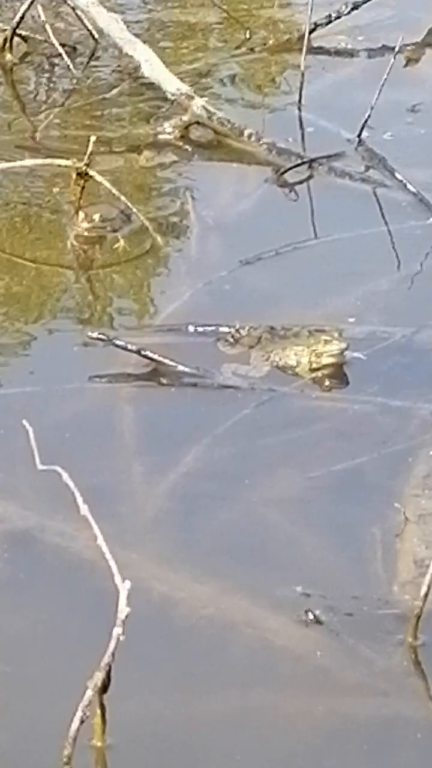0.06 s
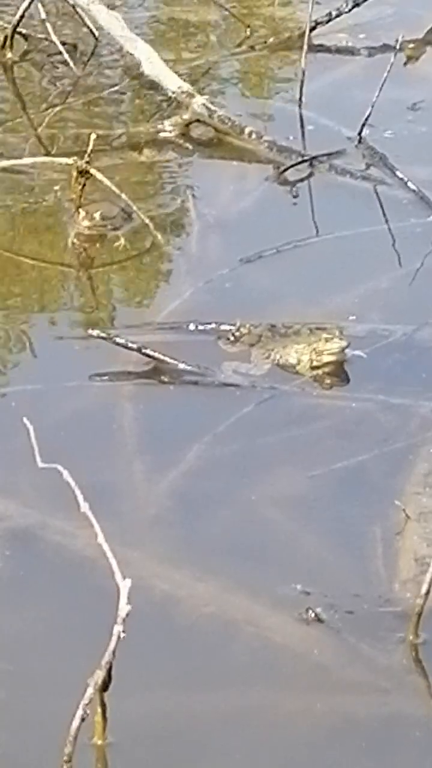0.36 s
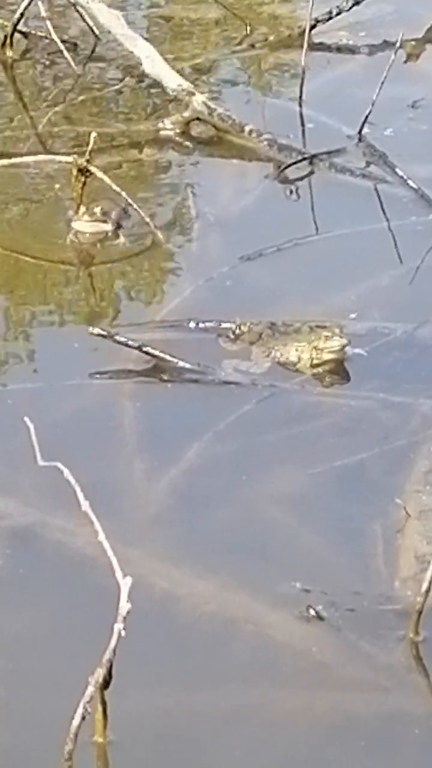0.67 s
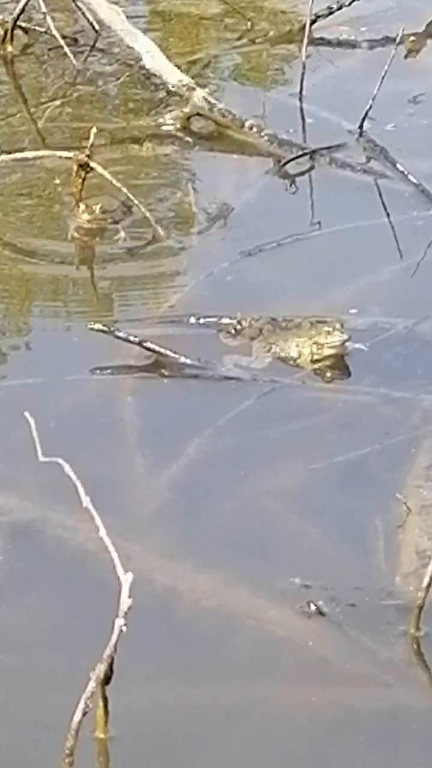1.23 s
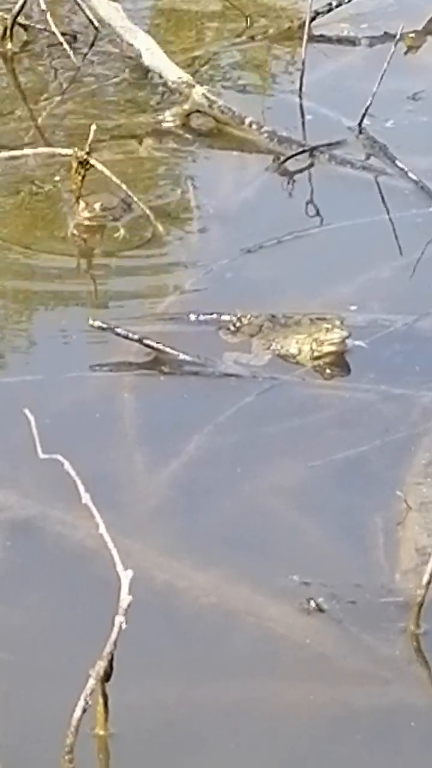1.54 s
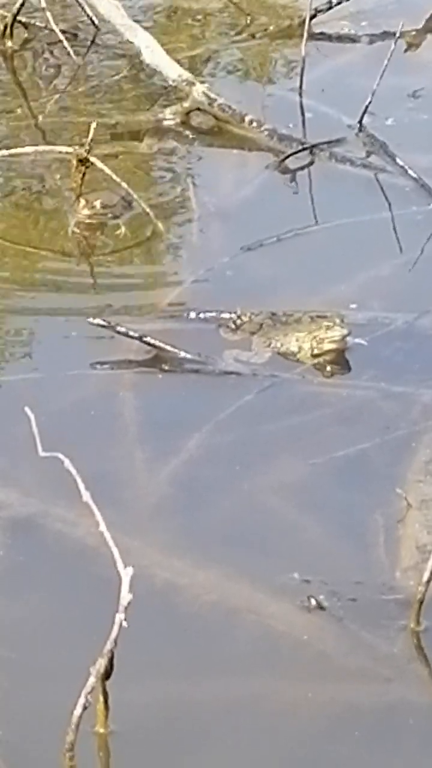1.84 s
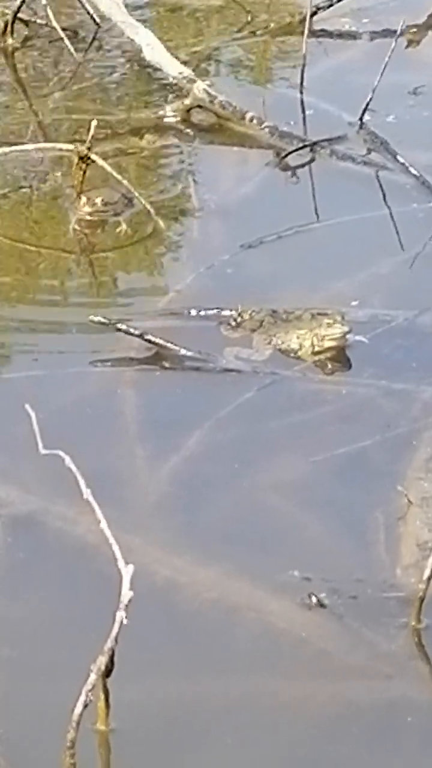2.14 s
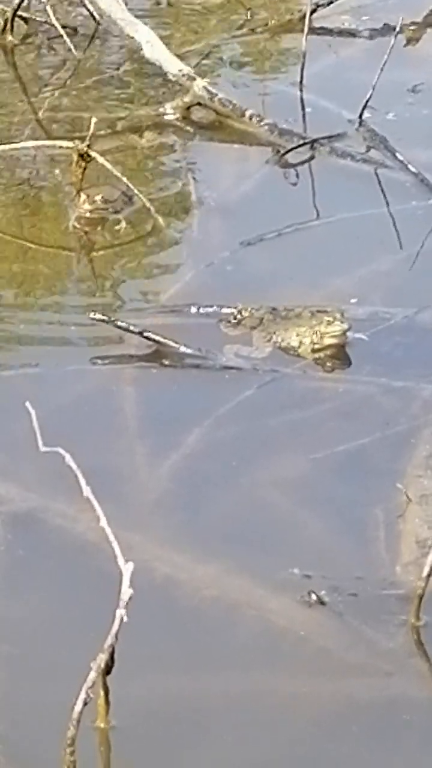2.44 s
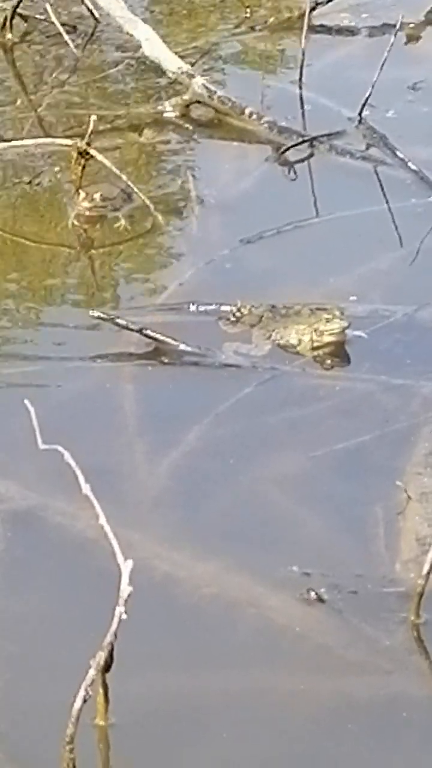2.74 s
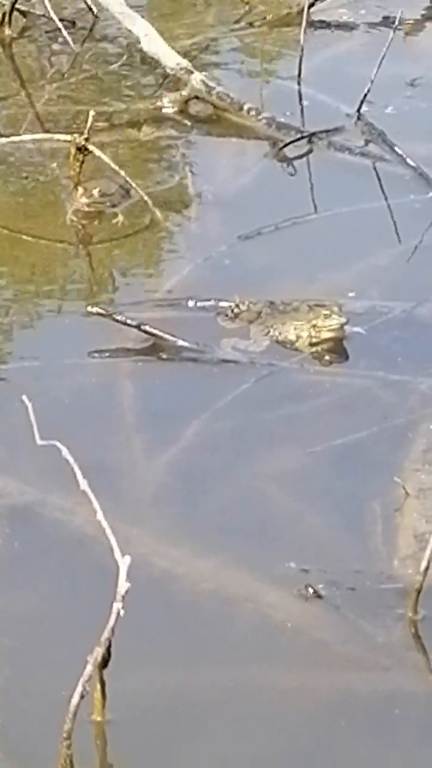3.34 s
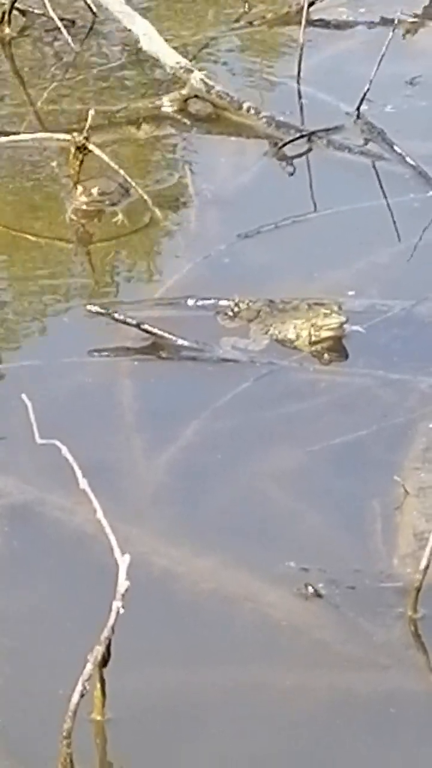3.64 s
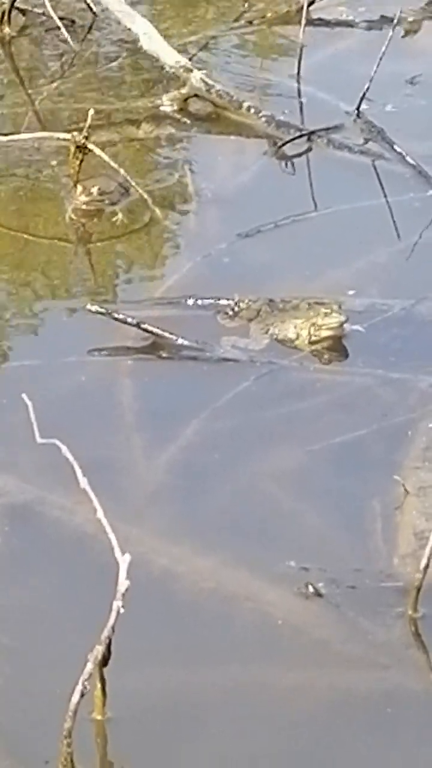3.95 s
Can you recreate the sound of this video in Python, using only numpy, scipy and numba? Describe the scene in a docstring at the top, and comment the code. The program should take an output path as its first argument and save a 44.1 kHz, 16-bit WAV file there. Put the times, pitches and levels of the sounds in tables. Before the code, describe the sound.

Frogs croak at a pond. A bright one close to the microphone trills in three quick runs while deep, nasal and whining ones cut in and others call further off, over a faint breeze rumble and soft hiss.

```python
"""At a pond, water frogs call to each other. Each note is a train of throat pulses that slows and
turns ragged as the breath runs out, ringing in the vocal sacs (the frog's balloon-like cheeks).
A bright frog trills close by, a nasal, a deep and a whining one cut in, and others call further off.
The banks echo a little, a bird chirps twice, and a breeze rumbles on the microphone over a soft hiss."""
import sys
import numpy as np
from scipy import signal
from scipy.fft import rfft, irfft, next_fast_len
from scipy.io import wavfile
from scipy.ndimage import uniform_filter1d
from numba import njit

SR = 44100
rng = np.random.default_rng(int(sys.argv[2]) if len(sys.argv) > 2 else 0)


def transcribe(u):
    """Save the signal u as a 16-bit wav file named by the first command-line argument.

    u: samples, shape (n,) or (channels, n), limited to [-1, 1]; the rate is SR.
    q: integer samples, one column per channel.
    """
    v = np.clip(np.atleast_2d(u).T, -1, 1)
    q = np.round(v * 32767).astype(np.int16)
    wavfile.write(sys.argv[1], SR, q)


N = 176400
TIME_S = np.arange(N) / SR
PADDED = next_fast_len(N + SR)  # spare room for echoes to die away


def from_db(db):
    """Turn decibels into a number to multiply by."""
    return 10 ** (np.asarray(db) / 20)


def rms_one(x):
    """Scale a sound so that its average power is 1."""
    return x / np.sqrt(np.mean(x ** 2) + 1e-20)


def at_hz(points, hz):
    """Read between rows of (frequency, value), giving each octave equal room."""
    row_hz, value = np.transpose(points)
    return np.interp(np.log(np.maximum(hz, 1)), np.log(row_hz), value)


def coloured(x, colour, size):
    """Turn each frequency up or down as a colour table says."""
    gain = from_db(at_hz(colour, np.arange(size // 2 + 1) * SR / size))
    cepstrum = irfft(np.log(gain), size)
    # folding this in half makes the filter ring after a pulse, never before it
    cepstrum[1:size // 2] *= 2
    cepstrum[size // 2 + 1:] = 0
    return irfft(rfft(x, size) * np.exp(rfft(cepstrum)), size)


@njit
def ringing(x, hz, width_hz):
    """Make a sound ring at a moving pitch; a narrower width rings longer."""
    angle = 2 * np.pi * hz / SR
    r = np.exp(-np.pi * width_hz / SR)
    y = np.zeros(len(x))
    for i in range(2, len(x)):
        push = (1 - r * r) / 2 * (x[i] - x[i - 2])
        y[i] = push + 2 * r * np.cos(angle[i]) * y[i - 1] - r * r * y[i - 2]
    return y


def throat(rate_hz, ragged, jitter, count=96, waver=.009, uneven_db=3.75, breath=.07):
    """Sharp pulses, each with a puff of hiss. Where ragged, their timing and strength are uneven."""
    size = len(rate_hz)
    cycles = np.cumsum(rate_hz) / SR
    slip, force, wander = rng.standard_normal((3, count))
    ragged = np.interp(np.arange(count), cycles, ragged)
    due = np.arange(count) + .5 + waver * np.cumsum(wander) + jitter * ragged * slip
    strengths = from_db(uneven_db * ragged * np.minimum(force, 1))
    pulses = np.zeros(size)
    for cycle, strength in zip(due, strengths):
        if cycle < cycles[-1]:
            at = np.interp(cycle, cycles, np.arange(size))
            near = np.arange(max(int(at) - 10, 0), min(int(at) + 10, size))
            pulses[near] += strength * np.sinc(near - at)  # a click that can fall between samples
    puffs = rng.standard_normal(size) * np.exp(-2 * (cycles % 1))
    return pulses + breath * puffs * 2 * np.sqrt(rate_hz / SR)


def vocal_sac(pulses, sac_hz, voice):
    """The tight sac rings on between pulses; 'even' (0 to 1) steadies how loudly it rings."""
    ring = ringing(pulses, sac_hz, voice['width_hz'])
    loudness = uniform_filter1d(np.abs(signal.hilbert(ring)), size=16)
    steadied = ring / (loudness / loudness.mean() + .1) ** voice['even']
    return pulses + from_db(voice['sac_db']) * steadied


# Short detours the sound takes off twigs and water: delay_s
DETOURS_S = [0.00065, 0.00079, .00137]
def scattered(x, smear):
    """Very quick repeats off twigs and water blur each pulse (all-pass filters)."""
    for delay_s in DETOURS_S:
        gap = np.zeros(int(delay_s * SR))
        x = signal.lfilter(np.r_[-smear, gap, 1], np.r_[1, gap, -smear], x)
    return x


def croak(length_s, rate_hz, sac_hz, glide_hz, voice, colour, ring, size=8192):
    """One note: the pulses speed up to a crest, then slow and turn ragged. It swells and stops short."""
    t = np.arange(int((length_s + voice['release_s']) * SR)) / SR
    along = np.minimum(t / length_s, 1)  # 0 to 1; 'crest' and 'full_at' are points on this scale
    sag_chance, ring_chance = rng.uniform(-.987, 1, 2)
    before = np.maximum(1 - along / voice['crest'], 0)
    after = np.maximum(along - voice['crest'], 0) / (1 - voice['crest'])
    sag = voice['sag'] * (1 + .119 * sag_chance)  # share of the pulse rate lost by the end
    speed = 1 - voice['lift'] * before ** 2 - sag * after ** voice['sag_curve']
    pulses = throat(rate_hz * speed, after ** 2, voice['jitter'])
    sound = vocal_sac(pulses, sac_hz + glide_hz * along, voice)
    if ring:
        bend = ring['spread'] * ring_chance - ring['bow'] * (2 * along - 1) ** 2 / 2
        sound += from_db(ring['db']) * ringing(pulses, ring['hz'] * (1 + bend), ring['width_hz'])
    growth = np.minimum(along / voice['full_at'], 1) ** voice['swell_curve']
    swell = voice['start_gain'] + (1 - voice['start_gain']) * growth
    stop = np.clip(1 - (t - length_s) / voice['release_s'], 0, 1)
    sound = scattered(coloured(sound * swell * stop, colour, size), voice['smear'])
    return rms_one(sound) * np.sqrt(length_s * SR / size)


# Echoes off the banks: left_delay_s, right_delay_s, level_db (added to each caller's echo_db)
BANK_ECHOES = [(.0085, 0.0069, 2), (0.0204, 0.03, -3.5)]
def pond_echoes(fade_s=.35, tail_db=-1.5):
    """The pond's answer to a click, as a spectrum: bank echoes and a thin tail from the bushes."""
    t = np.arange(SR) / SR
    tail = rng.standard_normal((2, SR)) * from_db(-60 * t / fade_s) * (t > .006)
    response = from_db(tail_db) * rms_one(tail) / np.sqrt(SR)
    for left_s, right_s, db in BANK_ECHOES:
        response[[0, 1], [int(left_s * SR), int(right_s * SR)]] += from_db(db)
    return rfft(response, PADDED)


def placed(dry, place, echo_db, echoes):
    """Give a caller a direction by level and timing between the ears, and add its echoes."""
    hz = np.maximum(np.arange(PADDED // 2 + 1) * SR / PADDED, 1)
    ears, place = np.array([[1], [-1]]), np.array(place)
    gain = from_db(ears * at_hz(place[:, :2], hz) / 2)
    gain /= np.sqrt(np.mean(gain ** 2, axis=0))
    lead_s = at_hz(place[:, ::2], hz) / 1000
    direct = np.exp(1j * np.pi * hz * lead_s * ears)
    return irfft(rfft(dry, PADDED) * gain * (direct + from_db(echo_db) * echoes), PADDED)[:, :N]


def frog(notes, voice, colour, place, echoes, ring=None):
    """Play one frog's croaks from its spot on the pond."""
    dry = np.zeros(PADDED)
    for start_s, length_s, db, rate_hz, sac_hz, glide_hz in notes:
        sound = from_db(db) * croak(length_s, rate_hz, sac_hz, glide_hz, voice, colour, ring)
        first = int((start_s - sum(DETOURS_S)) * SR)  # early, because the detours delay it
        dry[first + np.arange(len(sound))] += sound
    return placed(dry, place, voice['echo_db'], echoes)


# Notes of the trill: start_s, level_db
TRILL_NOTES = [(-.03, -23.5), (.058, -21), (.15, -22.5), (0.234, -30.5), (1.055, -23), (1.143, -22),
               (1.236, -21), (1.325, -20.5), (1.417, -20), (1.509, -21), (1.598, -21.5), (1.687, -21),
               (1.78, -21.5), (2.391, -23.5), (2.469, -22), (2.555, -21.5), (2.643, -21.5), (2.731, -21),
               (2.82, -21.5), (2.91, -21), (3, -21.5), (3.09, -20.5), (3.183, -22.5), (3.272, -24.5),
               (3.363, -32)]
# How the trill moves: time_s, pulse_rate_hz, sac_hz, overtone_hz
TRILL_PITCHES = [(.13, 408.4, 2530, 9500), (.236, 337, 2180, 9740), (1.056, 449.2, 2160, 12500),
                 (1.24, 434.7, 2600, 10770), (1.7, 416.7, 2540, 8950), (2.39, 404.8, 2460, 11240),
                 (3.17, 368.5, 3024, 9150), (3.365, 272.5, 2450, 8270)]
# Its tone colour: frequency_hz, level_db
TRILL_TONE = [(200, -60), (370, 4), (750, 2.5), (1500, -5), (2700, 5), (3130, -6), (3410, 6), (4000, 2.5),
              (4900, -9), (6300, -11), (7250, -3.5), (8100, -11.5), (14500, -23)]
# Its direction: frequency_hz, left_louder_db, left_earlier_ms
TRILL_PLACE = [(1250, -2.5, 0.06), (2484, -9, 0.15), (3150, 5, .12), (6670, -14.5, 0.096), (9100, 3, 0.075)]
def bright_frog(echoes, length_s=.043, glide_hz=-120, overtone_width_hz=770, overtone_db=15):
    """Quick runs of notes close by, with a thin high ring that sinks as the trill tires."""
    voice = dict(start_gain=.21, full_at=.64, swell_curve=1.23, release_s=.003,
                 lift=.1446, crest=.38, sag=.45, sag_curve=2.2, jitter=.032,
                 width_hz=820, sac_db=42.5, even=.35, smear=.56, echo_db=-18.5)
    times, rate_hz, sac_hz, overtone_hz = np.transpose(TRILL_PITCHES)
    notes = [(s, length_s, db, np.interp(s, times, rate_hz), np.interp(s, times, sac_hz), glide_hz)
             for s, db in TRILL_NOTES]
    ears = frog(notes, voice, TRILL_TONE, TRILL_PLACE, echoes)
    hz = np.interp(TIME_S, times, overtone_hz)
    overtone = [ringing(ringing(ear, hz, overtone_width_hz), hz, overtone_width_hz) for ear in ears]
    return ears + from_db(overtone_db) * np.array(overtone)


def noise(colour):
    """Noise with a tone colour, different in each ear."""
    return rms_one(coloured(rng.standard_normal((2, PADDED)), colour, PADDED)[:, :N])


# Tone colour of the hiss: frequency_hz, level_db
AIR_TONE = [(1400, -0.5), (6000, -16.5), (15000, -28.5)]
def still_air(level_db=-61):
    """A soft, steady hiss behind everything."""
    return from_db(level_db) * noise(AIR_TONE)


# Strength of the breeze before gusts are added: time_s, level_db
BREEZE_LEVELS = [(.4, -69), (.58, -52), (.8, -63.5), (1.85, -65.5), (2.05, -47), (2.35, -55.5),
                 (2.85, -48.5), (4, -51)]
# Its tone colour: frequency_hz, level_db
BREEZE_TONE = [(55, -0.5), (100, -7), (200, -24), (1000, -72)]
def breeze(gust_count=43, gust_db=8.5):
    """Moving air bumps the microphone and makes a low, uneven rumble."""
    rumble = from_db(np.interp(TIME_S, *np.transpose(BREEZE_LEVELS))) * noise(BREEZE_TONE)
    bumps = rng.standard_normal(gust_count)
    gusts = np.interp(np.linspace(0, gust_count, N), np.arange(gust_count), bumps)
    return rumble * from_db(gust_db * gusts)


# The far, deep and whining frogs build on this voice too.
NASAL_VOICE = dict(start_gain=.32, full_at=.26, swell_curve=.82, release_s=.0083,
                   lift=.031, crest=.087, sag=.5, sag_curve=1.35, jitter=.061,
                   width_hz=143, sac_db=32.5, even=.21, smear=.36, echo_db=-13)
# Nasal croaks: start_s, length_s, level_db, pulse_rate_hz, sac_hz
NASAL_CROAKS = [(.132, 0.056, -41, 525, 1620), (.2, 0.061, -39, 456, 1820),
                (.28, 0.054, -37.5, 461.5, 1770), (.362, 0.056, -36, 450.7, 1574),
                (.45, 0.062, -41, 463, 1466), (1.39, 0.06, -39, 496.7, 1870),
                (3.563, 0.052, -33, 516, 1750), (3.643, 0.053, -33, 513, 1950),
                (3.726, 0.054, -34, 486, 2000), (3.813, 0.073, -35, 468, 1690),
                (3.893, 0.038, -40, 436, 1570)]
# Their tone colour: frequency_hz, level_db
NASAL_TONE = [(220, -5), (420, 14.5), (2600, -7), (4400, 3.5), (5400, -29), (14000, -90)]
# Their direction: frequency_hz, left_louder_db, left_earlier_ms
NASAL_PLACE = [(900, -6.5, -.14), (2000, 9, -0.12), (3000, 4, -0.18)]
def nasal_frog(echoes, glide_hz=-19):
    """Fast pulses through a sharply tuned sac give a pinched croak."""
    notes = [(*row, glide_hz) for row in NASAL_CROAKS]
    return frog(notes, NASAL_VOICE, NASAL_TONE, NASAL_PLACE, echoes)


# Distant croaks: start_s, length_s, level_db
FAR_CROAKS = [(.32, 0.18, -45), (.41, 0.098, -43.5), (.705, 0.089, -41), (1.84, 0.12, -55),
              (3.225, 0.13, -43)]
# Their tone colour: frequency_hz, level_db
FAR_TONE = [(220, -19.5), (400, 5.5), (600, -5.5), (10000, -43.5)]
# Their direction, shared with the bird: frequency_hz, left_louder_db, left_earlier_ms
FAR_PLACE = [(1000, -1.4, 0.024)]
def far_frogs(echoes, rate_hz=405, sac_hz=1260, glide_hz=200):
    """Longer, rougher croaks from further off, with more echo."""
    voice = dict(NASAL_VOICE, sag=.14, jitter=.254, sac_db=8.5, echo_db=-7)
    notes = [(*row, rate_hz, sac_hz, glide_hz) for row in FAR_CROAKS]
    return frog(notes, voice, FAR_TONE, FAR_PLACE, echoes)


# Deep croaks: start_s, length_s, level_db, pulse_rate_hz
DEEP_CROAKS = [(.651, 0.049, -29, 436.3), (.748, 0.045, -28, 428.8), (.842, 0.062, -29, 397.3),
               (.945, 0.063, -30, 405.5), (1.055, .05, -32.5, 397.3), (2.303, 0.066, -31, 419.5),
               (2.402, 0.042, -29, 380.7), (2.506, 0.043, -30.5, 347.7), (2.61, 0.049, -31, 334.8),
               (2.707, 0.042, -31, 352), (3.739, 0.054, -29.5, 432.3), (3.833, 0.049, -28.5, 428),
               (3.943, 0.041, -29, 365.3)]
# Their tone colour: frequency_hz, level_db
DEEP_TONE = [(200, -52), (380, 10), (700, -5), (1800, 8), (2700, -11.5), (3350, -3), (3900, -22),
             (5600, -24.5), (14000, -57)]
# Their direction: frequency_hz, left_louder_db, left_earlier_ms
DEEP_PLACE = [(400, -11, -0.34), (1610, -4, -0.21), (3330, 4.5, -0.13), (4820, -3, -0.045)]
def deep_frog(echoes, sac_hz=813, glide_hz=-89):
    """A low-tuned sac, plus a high ring that rises and falls within each note."""
    voice = dict(NASAL_VOICE, full_at=.94, crest=.0608, sag=.6, sac_db=17, even=.056, smear=.31)
    ring = dict(hz=4850, width_hz=330, db=22, bow=.06, spread=.02)
    notes = [(*row, sac_hz, glide_hz) for row in DEEP_CROAKS]
    return frog(notes, voice, DEEP_TONE, DEEP_PLACE, echoes, ring)


# Two chirps: start_s, length_s, middle_pitch_hz, arch_hz, half_rise_hz, level_db
BIRD_CHIRPS = [(0.678, 0.055, 5630, 100, 642, -51.5), (0.717, .056, 4500, 620, -91, -36.5)]
def bird(echoes, flutter_depth=.023, flutter_per_s=230, overtone_db=-21.5, echo_db=-12):
    """A faint rising whistle and an arched one, fluttering and blurred by distance."""
    dry = np.zeros(N)
    flutter = np.interp(TIME_S * flutter_per_s, np.arange(N), rng.standard_normal(N))
    for start_s, length_s, middle_hz, arch_hz, half_rise_hz, db in BIRD_CHIRPS:
        along = np.clip(2 * (TIME_S - start_s) / length_s - 1, -1, 1)
        pitch_hz = middle_hz - arch_hz * along ** 2 + half_rise_hz * along
        phase = 2 * np.pi * np.cumsum(pitch_hz * (1 + flutter_depth * flutter)) / SR
        whistle = np.sin(phase) + from_db(overtone_db) * np.sin(2 * phase)
        dry += from_db(db) * (1 - along ** 2) * whistle
    return placed(dry, FAR_PLACE, echo_db, echoes)


# Whining calls: start_s, length_s, level_db, pulse_rate_hz, sac_hz, sac_glide_hz
WHINE_CALLS = [(.768, 0.038, -26.5, 425.3, 706, 421), (.813, 0.035, -24, 293.4, 1186, 290),
               (.85, 0.049, -30, 334.7, 1630, 50), (.925, 0.078, -31.5, 345.8, 1470, 150),
               (1.48, 0.078, -27.5, 310.4, 1300, 562), (1.578, 0.043, -25, 402, 1820, 148),
               (1.657, 0.04, -22.5, 417.2, 2053, -140), (1.738, 0.0326, -27, 406.3, 1742, -96),
               (1.885, 0.04, -39.5, 411, 1237, -90), (1.93, .04, -50.5, 393, 1170, -83)]
# Their tone colour: frequency_hz, level_db
WHINE_TONE = [(190, -37.5), (340, 0), (2200, -6), (6000, -36.5)]
# Their direction, shared with the groan: frequency_hz, left_louder_db, left_earlier_ms
WHINE_PLACE = [(400, 3.5, 0.22), (2000, -9, .12), (3120, 13.5, 0.29), (4600, -8, 0.11)]
def whining_frog(echoes):
    """The sac rings at a steady level while its pitch slides, which makes a whine."""
    voice = dict(NASAL_VOICE, crest=.27, sag_curve=2.2, sac_db=33, even=.99)
    return frog(WHINE_CALLS, voice, WHINE_TONE, WHINE_PLACE, echoes)


# How the groan moves: time_s, pulse_rate_hz, level_db (how loud it is at that moment), sac_hz
GROAN_SHAPE = [(2.158, 273, -52.5, 800), (2.187, 317.6, -43.5, 1100), (2.206, 372, -31.5, 1440),
               (2.223, 343.5, -31, 1410), (2.273, 314.5, -24.5, 1260), (2.296, 336, -29, 1430),
               (2.313, 242.5, -23, 1520), (2.351, 195, -28, 1470)]
# Its tone colour: frequency_hz, level_db
GROAN_TONE = [(190, -38), (330, 5), (2100, -7), (2850, -20.5), (3300, -8), (4800, -24.5), (5500, -38),
              (14000, -39)]
def groan(echoes, clear_hz=310, ragged_hz=226):
    """A long clear call that opens, holds, and breaks up as its pulses slow."""
    times, *columns = np.transpose(GROAN_SHAPE)
    t = np.arange(times[0], times[-1], 1 / SR)
    rate_hz, db, sac_hz = (np.interp(t, times, column) for column in columns)
    ragged = np.interp(rate_hz, [ragged_hz, clear_hz], [1, 0])
    pulses = throat(rate_hz, ragged, jitter=.11)
    sound = vocal_sac(pulses, sac_hz, dict(width_hz=510, sac_db=27, even=0))
    sound = scattered(coloured(sound, GROAN_TONE, size=16384), smear=.15)
    sound = rms_one(sound[:len(t)]) * from_db(db)
    silence = np.zeros(int(times[0] * SR))
    return placed(np.r_[silence, sound], WHINE_PLACE, echo_db=-14, echoes=echoes)


def scene():
    """The frogs, the bird, the breeze and the still air, added together."""
    echoes = pond_echoes()
    frogs = (bright_frog(echoes) + deep_frog(echoes) + nasal_frog(echoes)
             + whining_frog(echoes) + groan(echoes) + far_frogs(echoes))
    return frogs + breeze() + bird(echoes) + still_air()


def record(dry, cutoff_hz=15700):
    """Cut away the very highest treble."""
    return signal.sosfilt(signal.cheby2(14, 70, cutoff_hz, fs=SR, output="sos"), dry)


dry = scene()
out = record(dry)
transcribe(out)
```